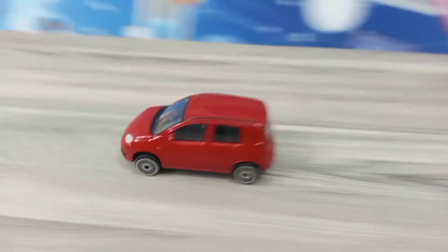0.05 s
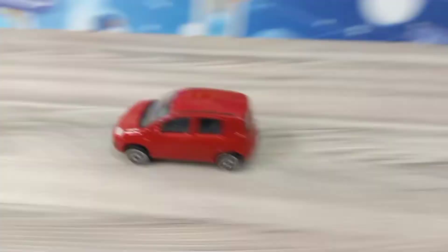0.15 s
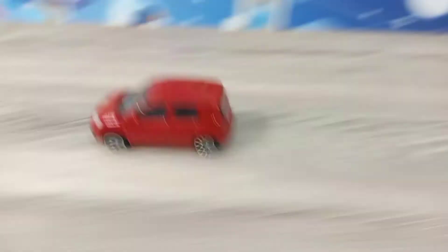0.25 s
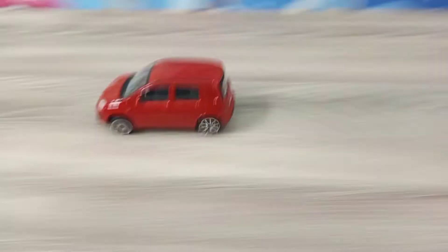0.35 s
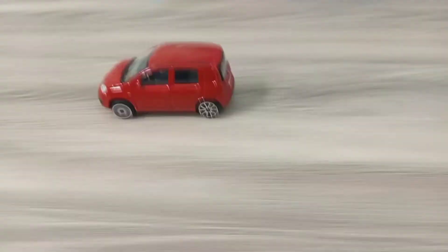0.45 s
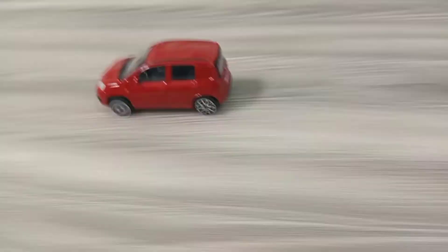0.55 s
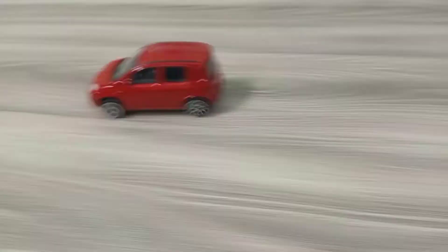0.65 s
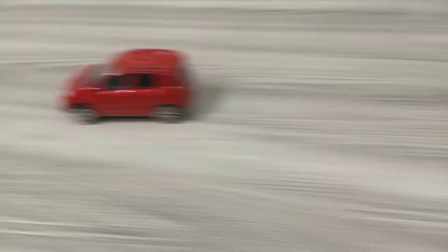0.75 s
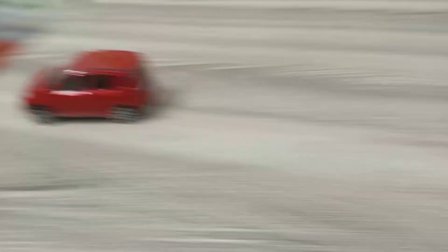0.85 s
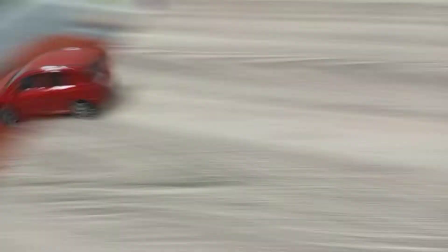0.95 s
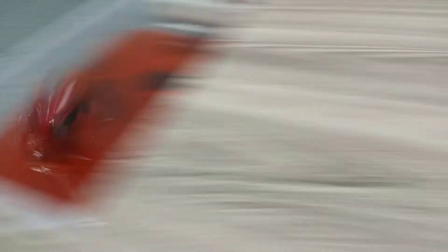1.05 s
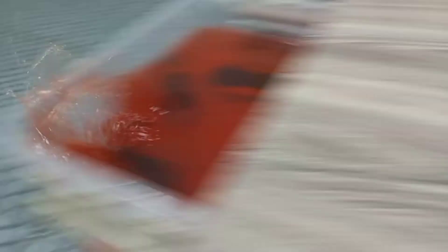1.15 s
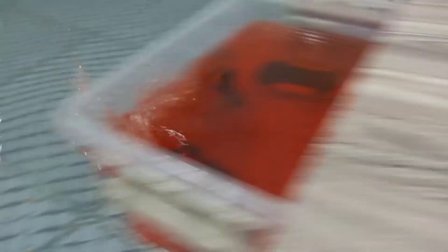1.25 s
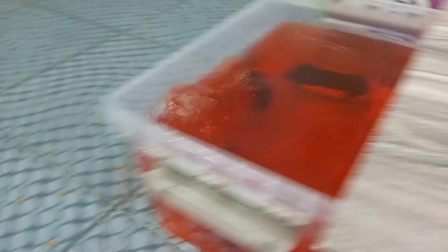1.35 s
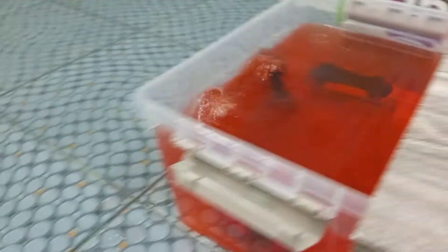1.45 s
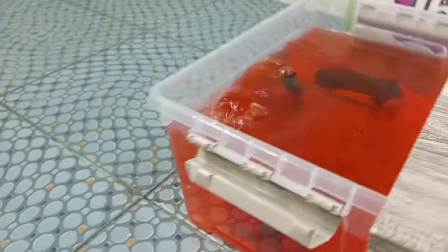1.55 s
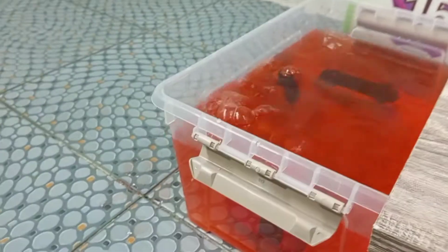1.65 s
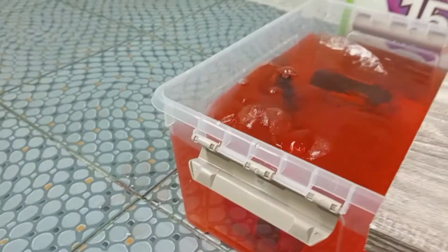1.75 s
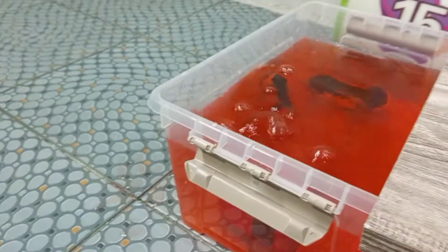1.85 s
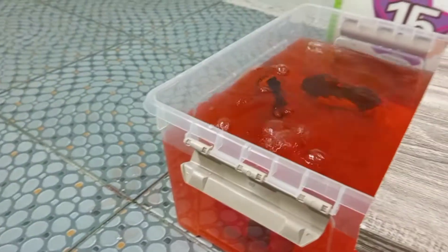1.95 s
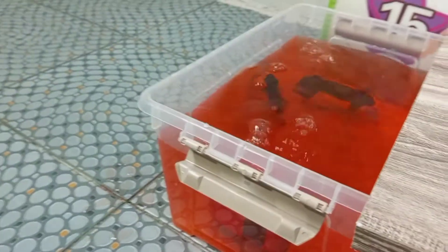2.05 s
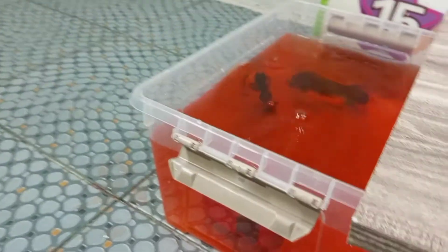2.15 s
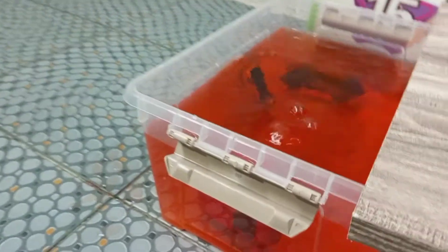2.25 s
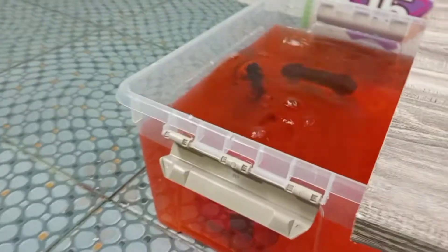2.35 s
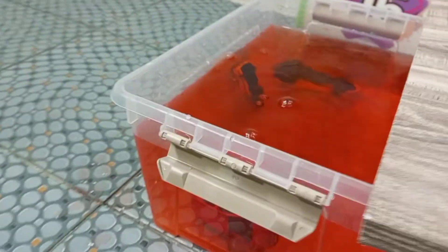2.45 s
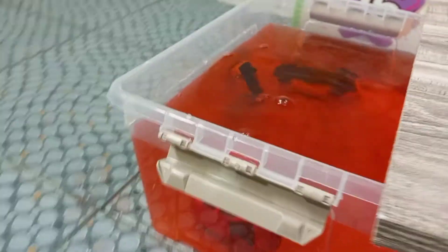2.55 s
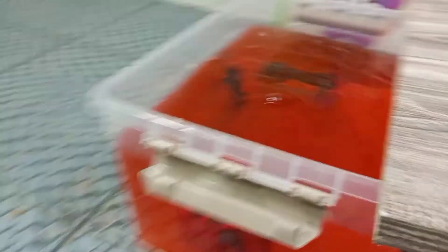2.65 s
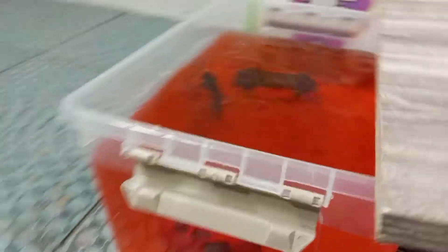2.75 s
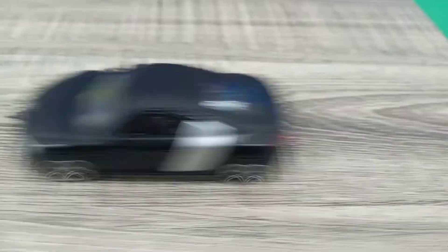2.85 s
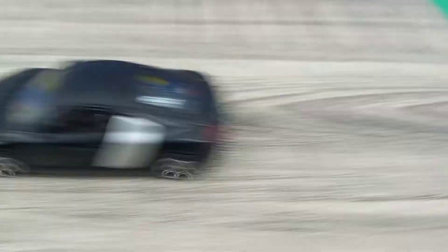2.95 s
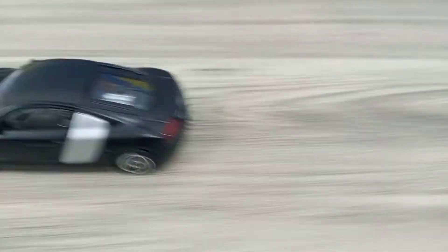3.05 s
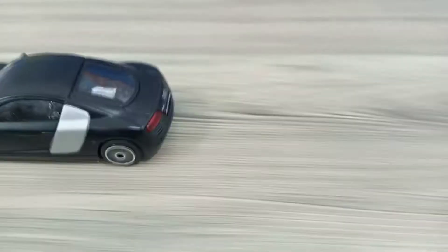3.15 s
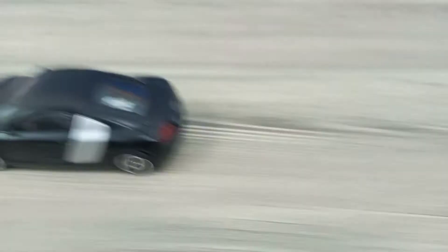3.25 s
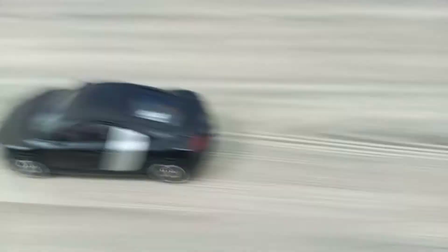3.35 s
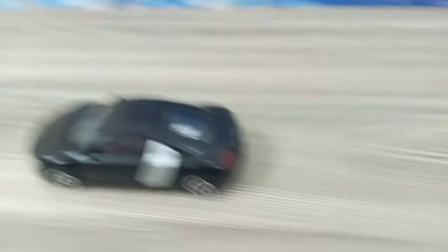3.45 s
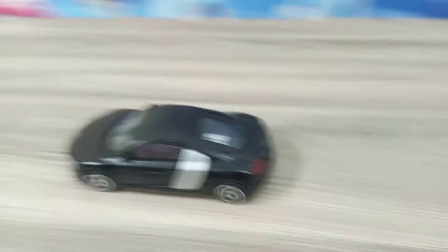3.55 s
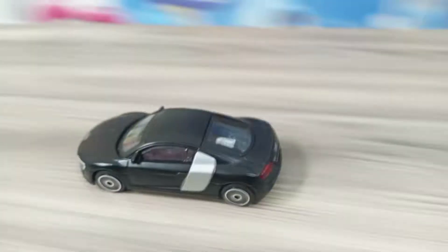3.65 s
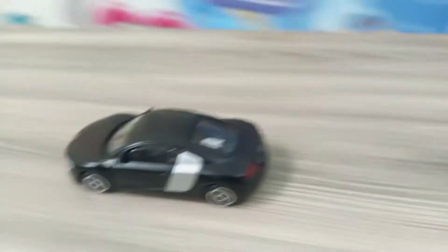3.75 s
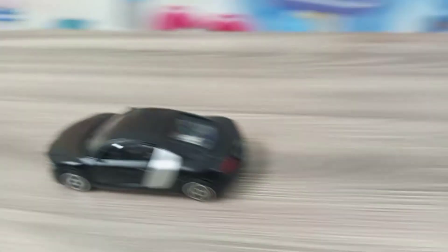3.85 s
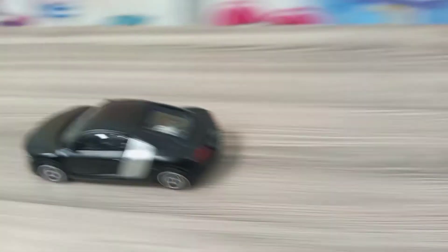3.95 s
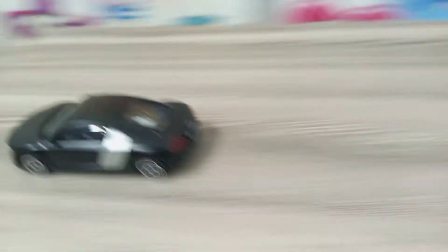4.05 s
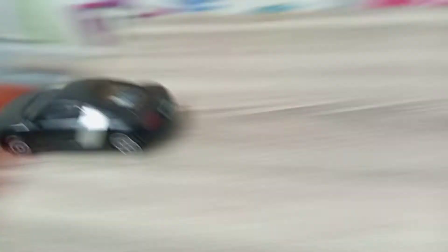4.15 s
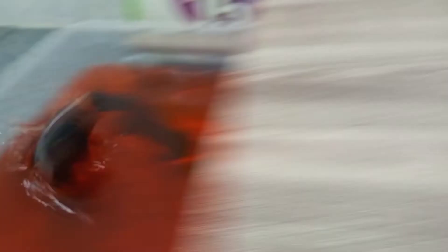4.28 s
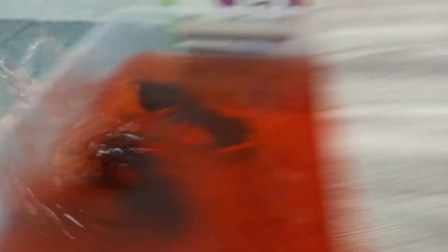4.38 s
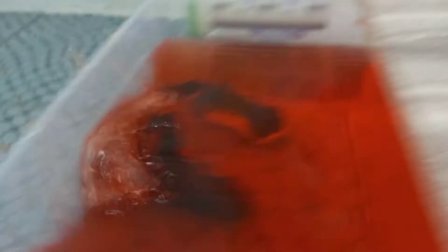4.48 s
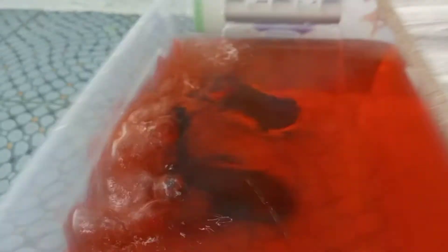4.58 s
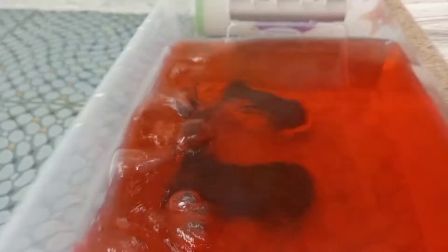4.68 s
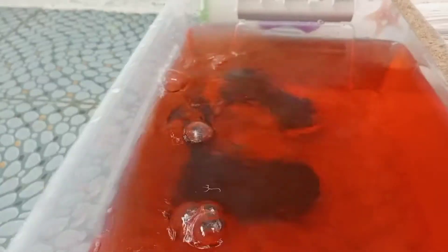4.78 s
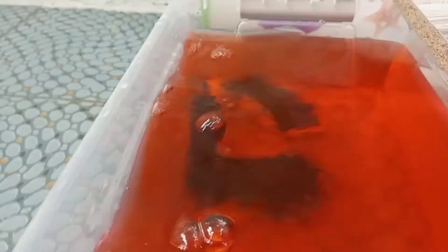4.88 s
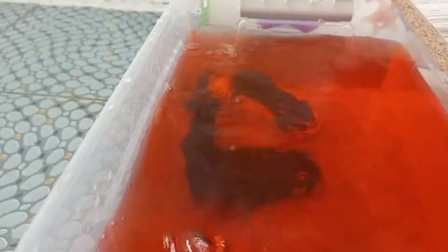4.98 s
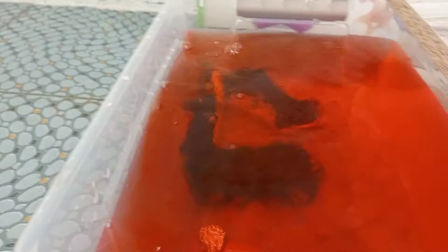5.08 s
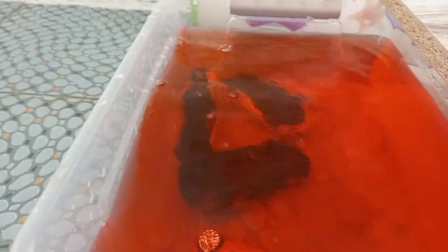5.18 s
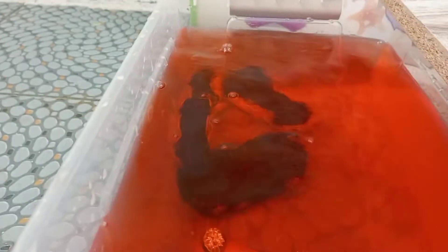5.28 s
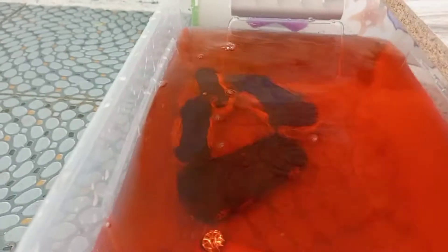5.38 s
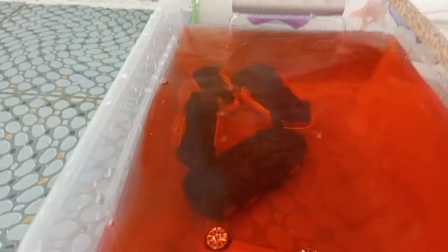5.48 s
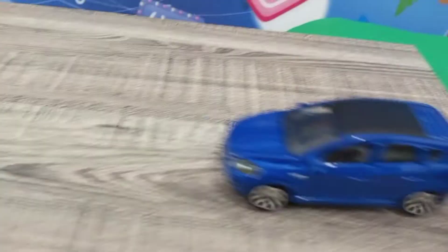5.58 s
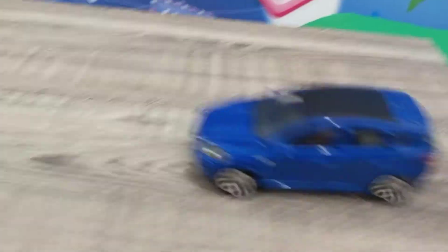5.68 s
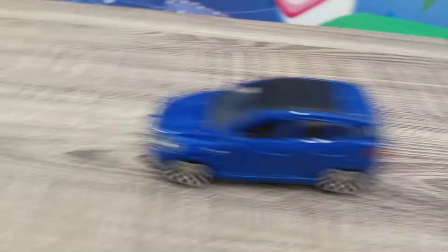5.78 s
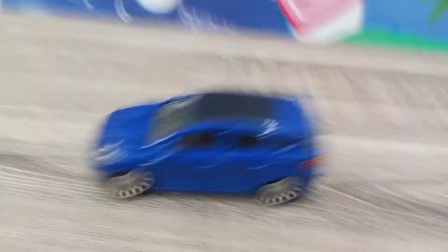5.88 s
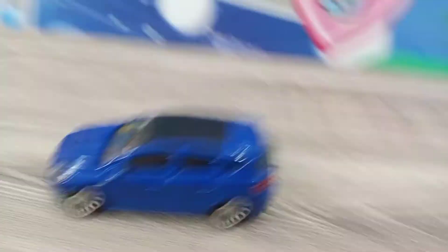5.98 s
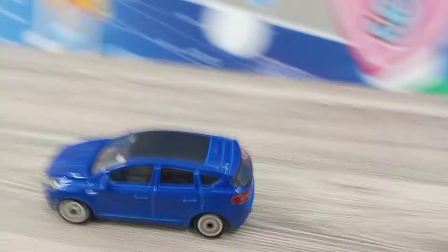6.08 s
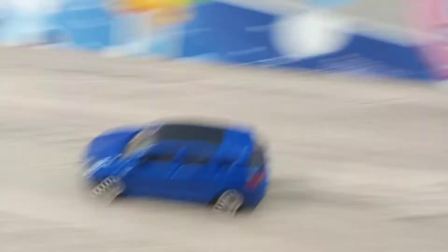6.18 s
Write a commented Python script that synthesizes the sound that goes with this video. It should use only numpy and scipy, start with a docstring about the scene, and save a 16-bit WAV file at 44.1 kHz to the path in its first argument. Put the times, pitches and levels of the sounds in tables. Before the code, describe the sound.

A small metal toy car rattles down a wooden ramp from the start, its wheels humming and jingling lightly. At about 1.2 seconds it splashes into a plastic tub of water with a soft low boom, followed by gurgles, faint fizz and tiny drips that settle by 2.6 seconds. After a very brief dropout near 2.8 seconds, a second car rolls down, growing louder, with sharp clicks from its loose axles. It splashes in at about 4.4 seconds and clinks against the tub and the first car. The water sloshes, bubbles and fizzes until another tiny dropout around 5.6 seconds. A third car then starts rolling, quieter but building, until the end just after 6 seconds. Everything sounds close in a small room, with a faint low rumble, a few very faint high chirps and soft thumps near 0.3, 2.6, 3.1 and 6.2 seconds.

```python
"""Three die-cast toy cars rattle down a wooden ramp, one after another; the first two splash into a plastic
tub of water, which gurgles, fizzes and settles. The wood grain jolts the wheels and rings shell, loose
axles and board; in the water, trapped air rings as bubbles and spray crackles. Around them are a small
room, a low rumble, a few soft close thumps and high chirps. The sound drops out briefly between cars."""
import sys
import numpy as np
from scipy import signal
from scipy.fft import rfft, irfft, next_fast_len
from scipy.io import wavfile
from scipy.ndimage import uniform_filter1d, map_coordinates

SR = 44100
rng = np.random.default_rng(int(sys.argv[2]) if len(sys.argv) > 2 else 0)


def output_pcm(signal):
    """Save a mono or channel-first signal as 16-bit PCM at the path in sys.argv[1].

    Samples are clipped to [-1, 1] before scaling.
    """
    pcm = np.clip(np.atleast_2d(signal).T, -1, 1) * 32767
    wavfile.write(sys.argv[1], SR, np.round(pcm).astype(np.int16))


N = 274302

# silent gaps between one car's run and the next: start/s, end/s
GAPS = [(2.809, 2.817), (5.576, 5.584)]
# spectrum of fine spray: f/Hz, level/dB
SPRAY = [(2000, -44), (3300, 2.5), (4500, 8), (6500, -0.5), (9000, 3), (12500, 11), (17000, 2.5)]
# bright snap of a bursting drop: f/Hz, width/Hz, level/dB
SPLAT = [(4530, 2300, 3.5), (10580, 3500, 14)]


def amp(db):
    """Gain of a level in dB."""
    return 10 ** (np.asarray(db) / 20)


def unit(x):
    """Scaled to rms 1."""
    return x / np.sqrt(np.mean(x ** 2) + 1e-20)


def along(points, hz):
    """(f/Hz, value) points read on a log axis."""
    f, values = np.transpose(points)
    return np.interp(np.log(hz + 1), np.log(f + 1), values)


def curves(rows):
    """An envelope for each column after the time, then a gate that is open over the table's span."""
    times, *columns = np.transpose(rows)
    t = np.arange(N) / SR
    gate = uniform_filter1d(((t >= times[0]) & (t <= times[-1])) * 1., size=200)
    return [np.interp(t, times, column) for column in columns] + [gate]


def wobble(rate):
    """A smooth random curve, rate knots a second."""
    return map_coordinates(rng.standard_normal(int(N * rate / SR) + 4), [np.arange(N) * rate / SR])


def filtered(x, response):
    """x through a complex frequency response."""
    size = next_fast_len(N + SR // 2)
    return irfft(rfft(x, size) * response(np.fft.rfftfreq(size, 1 / SR)), size)[:N]


def resonant(x, modes):
    """x ringing through resonances (f/Hz, width/Hz, level/dB) of alternating polarity, rms 1."""
    def body(f):
        return sum((-1) ** k * amp(db) * 1j * f * width / (hz * hz - f * f + 1j * f * width)
                   for k, (hz, width, db) in enumerate(modes))
    return unit(filtered(x, body))


def coloured(x, spectrum):
    """x shaped by a spectrum (f/Hz, level/dB), rms 1."""
    return unit(filtered(x, lambda hz: amp(along(spectrum, hz))))


def patchy(x, depth_db):
    """Bands swell and fade on their own: random gain patches over time and frequency."""
    spectrum = signal.stft(x, nperseg=256)[2]
    patches = uniform_filter1d(rng.standard_normal(spectrum.shape), size=4, axis=0)
    patches = unit(uniform_filter1d(patches, size=8, axis=1))
    return unit(signal.istft(spectrum * amp(depth_db * patches), nperseg=256)[1][:N])


def jolts(rate, spread_db, hiss):
    """Random clicks of scattered size, rate a second, over a smooth hiss."""
    chance, size, noise = rng.random(N), rng.exponential(size=N), rng.standard_normal(N)
    clicks = (chance < rate / SR) * amp(spread_db * np.minimum(size, 2.4)) * np.sign(noise)
    return unit(clicks) + hiss * rng.standard_normal(N)


def hum(hz, rate):
    """A wavering tone that follows a pitch curve, rms 1."""
    phase = 2 * np.pi * np.cumsum(hz) / SR
    return unit(wobble(rate) * np.cos(phase) + wobble(rate) * np.sin(phase))


def add(out, s, burst):
    """Mixes a burst in at s seconds."""
    out[round(s * SR):][:len(burst)] += burst[:N - round(s * SR)]


def bursts(rows, hiss, t60, attack):
    """Short puffs (t/s, level/dB) cut from a hiss."""
    out, t = np.zeros(N), np.arange(SR // 20) / SR
    for s, db in rows:
        envelope = amp(db - 60 * t / t60) * (1 - np.exp(-(t / attack) ** 2))
        add(out, s, envelope * hiss[round(s * SR):][:len(t)])
    return out


def ticks(rows, colour, ring_t60, snap_t60, snap_gain, rough):
    """Each tick (t/s, level/dB, f/Hz) is a short, roughened ring plus a broad snap of noise."""
    out, t = np.zeros(N), np.arange(SR // 30) / SR
    noise = resonant(rng.standard_normal(N), colour)
    grit = (1 + rough * wobble(1700)) / np.hypot(1, rough)  # smears the note into a band
    for s, db, hz in rows:
        ring = amp(-60 * t / ring_t60) * np.sin(2 * np.pi * hz * t) * grit[round(s * SR):][:len(t)]
        snap = snap_gain * amp(-60 * t / snap_t60) * noise[round(s * SR):][:len(t)]
        add(out, s, amp(db) * (1 - np.exp(-t / 0.00041)) * (ring + snap))
    return out


def tones(rows, rise, attack, shake_rad=0., shake_rate=100):
    """Damped tones (t/s, level/dB, f/Hz, t60/s) gliding up by the fraction rise per t60."""
    out, t = np.zeros(N), np.arange(SR // 4) / SR
    waver = np.pad(shake_rad * wobble(shake_rate), (0, len(t)))
    for s, db, hz, t60 in rows:
        phase = 2 * np.pi * hz * (t + rise * t * t / (2 * t60)) + waver[round(s * SR):][:len(t)]
        add(out, s, amp(db - 60 * t / t60) * (1 - np.exp(-t / attack)) * np.sin(phase))
    return out


def struck(hits, modes, pivot_hz):
    """A tone row for each hit and mode; a harder hit favours the modes above the pivot."""
    return [(s, db + mode_db + hardness * np.log2(hz / pivot_hz), hz, t60)
            for s, db, hardness in hits for hz, mode_db, t60 in modes]


def bubbles(rate, centre_hz, spread, cycles, size_db=4.0):
    """A swarm of small bubbles, rate a second, each a rising blip; rms 1."""
    draw = rng.standard_normal((int(rate * N / SR), 2))
    onsets = np.sort(rng.random(len(draw))) * N
    hz = np.clip(centre_hz * np.exp(spread * draw[:, :1]), 150, 9000)
    t = np.arange(SR // 60) / SR
    life = hz * t / cycles
    envelopes = amp(size_db * draw[:, 1:]) * np.exp(-3 * life) * life ** .5
    blips = envelopes * np.sin(2 * np.pi * hz * t * (1 + 0.11 * life))
    index = onsets[:, None].astype(int) + np.arange(len(t))
    return unit(np.bincount(index.ravel(), blips.ravel(), minlength=N)[:N])


def room_air(run):
    """A quiet bed of air whose level steps with each car's run."""
    # room tone: f/Hz, level/dB
    spectrum = [(25, -28.5), (65, -3.5), (110, -6.5), (200, -6.5), (500, -13.5), (1200, -21), (5000, -23),
                (17000, -7)]
    # air in each run: level/dB
    levels = [-56, -57, -72.5]
    return amp(levels)[run] * coloured(rng.standard_normal(N), spectrum)


def rumble():
    """Low noise that comes and goes."""
    # swells: t/s, level/dB
    swells = [(0.0, -49), (0.33, -52), (0.52, -69), (1.09, -52), (1.21, -57), (1.3, -42.5), (1.63, -74.5),
              (2.86, -74), (3.15, -49.5), (3.24, -99), (3.39, -55), (4.5, -72), (4.57, -48), (4.97, -66.5),
              (5.18, -59.5), (5.32, -79), (6.05, -60), (6.22, -63)]
    # low-end colour: f/Hz, level/dB
    spectrum = [(25, -36.5), (48, -20.5), (66, 2), (85, -9.5), (108, 2), (140, -8.5), (220, -40.5)]
    return amp(curves(swells)[0]) * coloured(rng.standard_normal(N), spectrum)


def room(x):
    """The small room's reverb: each frequency dies at its own speed."""
    # decay between the walls: f/Hz, t60/s
    walls = [(200, 0.29), (2000, 0.25), (10000, 0.24)]
    hz, t, noise = signal.stft(rng.standard_normal(SR // 2), SR, nperseg=256)
    tail = signal.istft(noise * amp(-60 * t / along(walls, hz)[:, None]), SR, nperseg=256)[1]
    predelayed = np.pad(x, (300, 0))
    return signal.fftconvolve(predelayed, tail / np.linalg.norm(tail))[:N]


def chirps():
    """Brief bursts of noise at the very top of the range."""
    # chirps: t/s, level/dB
    hits = [(0.7941, -12), (0.9677, -7.5), (1.493, -18), (4.488, -8.5), (4.6797, -27), (5.1738, -14.5)]
    # their thin band: f/Hz, level/dB
    spectrum = [(13000, -56), (14200, 4.5), (15600, -6.5)]
    return bursts(hits, coloured(rng.standard_normal(N), spectrum), t60=.035, attack=.0012)


def thumps():
    """Soft, close thumps ring a few heavily damped modes."""
    # thumps: t/s, level/dB, hardness/(dB/octave)
    hits = [(0.307, -11, -1.5), (2.642, -17.5, 19), (3.132, -13, -6), (6.183, -21.5, 9)]
    # modes of the thud: f/Hz, level/dB, t60/s
    modes = [(174, -12.5, 0.028), (347, -1.5, 0.018), (533, 4.5, 0.016), (1526, -17, 0.0025),
             (6470, -37, 0.00036)]
    return tones(struck(hits, modes, pivot_hz=modes[2][0]), rise=0.084, attack=0.0044)


def fizz():
    """Sparse crisp pops: tiny bubbles bursting on the surface after each splash."""
    # spells of fizz: start/s, end/s, level/dB, fall/(dB/s)
    spells = [(1.504, 2.526, -71.5, -1), (4.603, 5.562, -64.5, 14.5)]
    t = np.arange(N) / SR
    pops = bubbles(60, centre_hz=7180, spread=.18, cycles=11, size_db=4.5)
    crackle = coloured(jolts(50, spread_db=5.5, hiss=0.05), SPRAY)
    envelope = sum(((t > start) & (t < end)) * amp(db - fall * (t - start))
                   for start, end, db, fall in spells)
    return envelope * unit(pops + 0.45 * crackle)


def droplets():
    """Droplets and bubbles tick on the settling surface."""
    # drops: t/s, level/dB, f/Hz
    drops = [(1.8127, -46, 5250), (1.8436, -39.5, 7200), (2.0363, -51, 4800), (2.1055, -51.5, 4750),
             (2.1444, -47, 6600), (2.1878, -37, 8130), (2.205, -34.5, 12500), (2.238, -38, 9000),
             (2.3082, -53, 5610), (2.4408, -47, 4770), (2.4738, -47, 4480), (5.1755, -38.5, 8830),
             (5.188, -50.5, 4840), (5.203, -51.5, 6200), (5.2304, -49, 4700)]
    return ticks(drops, SPLAT, ring_t60=0.015, snap_t60=0.0069, snap_gain=0.98, rough=0.99)


def bumps():
    """The sinking car clinks against the tub and the car lying in it, each time with a snap."""
    # contacts: t/s, level/dB, hardness/(dB/octave)
    hits = [(4.4346, -23, 7.5), (4.467, -14.5, -1.5), (4.485, -20, -4), (4.5019, -18.5, 10),
            (4.5259, -24, -5), (4.5569, -27, 4), (4.6234, -33, -9)]
    # modes of the clink: f/Hz, level/dB, t60/s
    modes = [(3370, -1.5, 0.016), (4570, -1.5, 0.023), (5520, -6, 0.016), (6590, -1, 0.019),
             (7050, -4.5, 0.014), (9400, -5.5, 0.017)]
    noise = resonant(rng.standard_normal(N), SPLAT)
    snaps = bursts([(s, db + 1) for s, db, _ in hits], noise, t60=.012, attack=0.00055)
    grit = amp(3.1 * wobble(700))
    return grit * tones(struck(hits, modes, pivot_hz=modes[1][0]), rise=0, attack=0.00065) + snaps


def surge_envelopes(start, end):
    """Gains of gurgle, trickle and spray in one stage: each surge dies fast, then settles slowly."""
    # surges as a car goes in and the tub sloshes:
    # t/s, rise/s, relative length, gurgle/dB, trickle/dB, spray/dB
    surges = [(1.242, 0.00099, 1, -29, -35.5, -26.5), (1.281, 0.0035, 1.25, -25, -39.5, -34),
              (1.33, 0.0083, 0.86, -43, -51.5, -29.5), (1.47, 0.0062, 2.26, -71, -47.5, -43),
              (1.689, 0.0029, 1.88, -61.5, -54, -51.5), (1.97, 0.05, 3.8, -67, -67, -53),
              (4.425, 0.0019, 0.62, -67, -39.5, -32.5), (4.471, 0.0032, 0.49, -31, -52, -31),
              (4.499, 0.0085, 1.44, -24, -31.5, -26.5), (4.547, 0.0038, 0.61, -25, -27.5, -21),
              (4.84, 0.0076, 0.67, -40.5, -46.5, -65.5), (4.892, 0.0059, 0.64, -53, -40.5, -38.5),
              (5.085, 0.0024, 0.33, -60, -61.5, -44.5), (5.384, 0.0068, 2.6, -56, -59, -80.5),
              (5.485, 0.0037, 0.49, -57.5, -51.5, -51)]
    # gurgle, trickle and spray at length 1: fall/(dB/s)
    fall = [134, 152.5, 175]
    tail_db, tail_db_per_s = np.array([-32.5, -12.5, -26.5]), np.array([40, 61, 34.5])
    power, span = np.zeros((N, 3)), slice(round(start * SR), round(end * SR))
    t = np.arange(N)[span, None] / SR
    for s, rise, length, *db in surges:
        if s > start - .1:
            age = np.clip(t - s, 0, None)
            decay = amp(-age / length * fall) ** 2 + amp(tail_db - age * tail_db_per_s) ** 2
            power[span] += (amp(db) * (1 - np.exp(-age / rise))) ** 2 * decay
    return np.sqrt(np.abs(uniform_filter1d(power, size=100, axis=0))).T


def slosh():
    """With each surge trapped air gurgles, water trickles back and spray crackles."""
    # first splash, second car breaking the surface, second splash: start/s, end/s
    stages = [(1.2, 2.81), (4.4, 4.496), (4.496, 5.58)]
    # air in and under the sinking car, one table a stage: f/Hz, width/Hz, level/dB
    cavities = [
        [(170, 320, -5.5), (493, 110, 1.5), (630, 380, -3), (950, 190, -1.5), (1400, 260, -0.5)],
        [(950, 170, -3.5), (1250, 260, -5.5)],
        [(215, 57, -4.5), (490, 177, -5.5), (665, 210, -7), (894, 165, -1.5), (1530, 300, -8)],
    ]
    # water running back: f/Hz, width/Hz, level/dB
    runoff = [(1780, 560, 3), (1917, 330, 8), (2550, 1100, -3.5)]
    swarm = bubbles(600, centre_hz=735, spread=0.442, cycles=6.6, size_db=5.5)
    trickle = resonant(rng.standard_normal(N), runoff)
    trickle = unit(trickle + 0.35 * bubbles(200, centre_hz=2082, spread=0.257, cycles=18))
    spray = coloured(amp(2 * wobble(44)) * jolts(160, spread_db=-0.5, hiss=1), SPRAY)
    spray = unit(spray + 0.29 * bubbles(220, centre_hz=6310, spread=0.25, cycles=7.3))
    out = np.zeros(N)
    for stage, modes in zip(stages, cavities):
        gurgle = resonant(swarm + 3 * rng.standard_normal(N), modes)
        out += np.sum(surge_envelopes(*stage) * [gurgle, trickle, spray], axis=0)
    return out


def splashes():
    """A car slaps the surface and drags air under; the tub booms, air pockets ring in churning water."""
    # the air hollow deepens as the second car sinks: t/s, level/dB, f/Hz
    plunge = [(4.43, -47, 1292), (4.465, -52, 1057), (4.485, -35.5, 850), (4.51, -42.5, 486)]
    # sharp slaps and drops on the surface: t/s, level/dB, f/Hz
    slaps = [(1.284, -28, 5960), (1.3305, -14.5, 5500), (1.4736, -32, 5180), (4.4514, -19.5, 3760),
             (4.4557, -23, 3560), (4.7095, -36.5, 6700), (4.8429, -35.5, 3680), (4.8941, -33, 4030),
             (5.0876, -37, 6077), (5.4896, -50.5, 3000)]
    # booms of the tub: t/s, level/dB, f/Hz, t60/s
    booms = [(1.25, -34, 109, 0.43), (1.33, -34, 110, 0.46)]
    # air pockets, rising in pitch near the surface: t/s, level/dB, f/Hz, t60/s
    pockets = [(1.208, -20.5, 1067, 0.034), (1.245, -9.5, 618, 0.025), (1.284, -26, 594, 0.12),
               (1.293, -4, 1280, 0.024), (1.36, -19.5, 1250, 0.051), (1.465, -31, 1734, 0.09),
               (1.476, -28, 430, 0.053), (1.597, -45, 534, 0.14), (1.62, -36, 480, .06),
               (1.638, -41, 560, 0.062), (1.706, -29.5, 410, 0.012), (1.75, -39, 368, 0.049),
               (4.474, -9, 1000, 0.025), (4.5, -12, 750, 0.028), (4.665, -39, 950, 0.052),
               (4.71, -32.5, 890, 0.18), (4.893, -27, 638, 0.072), (4.9, -34, 817, 0.1),
               (4.915, -28.5, 628, 0.096), (5.09, -48, 6200, 0.16), (5.39, -53, 642, 0.31),
               (5.424, -44, 597, 0.29), (5.462, -32, 685, 0.054), (5.488, -27, 620, 0.054),
               (5.505, -38, 845, 0.1)]
    hollow_db, hollow_hz, sinking = curves(plunge)
    out = sinking * amp(hollow_db) * hum(hollow_hz, rate=94)
    out += ticks(slaps, SPLAT, ring_t60=0.017, snap_t60=0.0069, snap_gain=1, rough=0.35)
    out += bumps()
    out += tones(booms, rise=0.0103, attack=0.013)
    return out + tones(pockets, rise=0.033, attack=0.0039, shake_rad=0.9, shake_rate=220)


def ramp_twang():
    """The ramp rings low as the first car tips off."""
    # the board's note: t/s, level/dB, f/Hz, t60/s
    twang = [(1.05, -35, 176, 0.39)]
    return tones(twang, rise=0.0089, attack=0.0065, shake_rad=1.6, shake_rate=61)


def wheel_jingles():
    """The first car's rims jingle at speed."""
    # jingles: t/s, level/dB
    hits = [(0.66, -27.5), (0.711, -25.5), (0.756, -25.5), (0.797, -20.5), (0.852, -27.5), (0.886, -27),
            (0.921, -24.5)]
    # rim resonances: f/Hz, width/Hz, level/dB
    rims = [(7500, 210, -10), (8800, 310, 2.5), (9000, 220, 0)]
    return bursts(hits, resonant(rng.standard_normal(N), rims), t60=0.07, attack=0.002)


def axle_knocks():
    """Single hard knocks of the loose axles stand out of the rattle."""
    # knocks: t/s, level/dB, f/Hz
    knocks = [(1.1119, -15.5, 4350), (2.8315, -43, 5350), (3.0086, -30, 5990), (3.1522, -23, 3450),
              (3.3209, -20, 5650), (3.4161, -10.5, 5880), (3.4476, -8.5, 5600), (3.474, -13, 5630),
              (3.5433, -10, 4300), (3.5462, -11, 5650), (3.7384, -13.5, 5410), (3.7633, -15, 5470),
              (3.8526, -15, 5370), (3.8671, -12.5, 5300), (3.9524, -12.5, 5770), (4.154, -11.5, 5520),
              (4.2028, -12.5, 5480), (4.2438, -10, 5630), (4.249, -12, 5570), (4.2742, -25.5, 5570),
              (4.2874, -11, 5400), (4.2931, -15.5, 6600), (5.9589, -32, 3380)]
    # their broad snap: f/Hz, width/Hz, level/dB
    crack = [(3530, 4100, -3), (5830, 3400, -2.5)]
    return ticks(knocks, crack, ring_t60=0.011, snap_t60=0.011, snap_gain=0.42, rough=0.72)


def axle_drift(x, slip_ms=0.491, rate=7):
    """The loose axles shift and their pitch with them: a slowly wandering delay."""
    return map_coordinates(x, [np.arange(N) + slip_ms * SR / 1000 * wobble(rate)], mode="mirror")


def rolling_cars():
    """Wood grain jolts the wheels, ringing shell, axles and board; the wheels hum and sizzle."""
    # one table a car, axle and hum relative to the shell: t/s, shell/dB, axle/dB, hum/dB, hum f/Hz
    rolls = [
        [(0, -33.5, -1.5, -4, 240), (.172, -33.5, -5.5, -9, 215), (.4, -30, -0.5, -9.5, 215),
         (.69, -30, -1, -12.5, 290), (.72, -33.5, 4, -35, 300), (.86, -30, 0.5, -16.5, 320),
         (.994, -31, 3, -19, 350), (1.1, -35.5, 3.5, -28, 400), (1.15, -41.5, -3.5, -34, 400),
         (1.24, -44, -4.5, -30, 400)],
        [(2.82, -66, -11, -27, 230), (2.932, -49, -3, -8, 240), (3.146, -38, -23.5, -15, 250),
         (3.38, -34, -4.5, -15.5, 270), (3.424, -36, -5.5, -16, 270), (3.5, -33.5, -2.5, -19.5, 280),
         (3.792, -29.5, -1.5, -17, 320), (4.11, -31.5, 2.5, -15.5, 340), (4.16, -33.5, 3.5, -16, 510),
         (4.29, -32.5, 3, -18, 540), (4.366, -36, -4.5, -22, 540), (4.43, -52, -6, -23.5, 540)],
        [(5.59, -78, -14.5, 0, 203), (5.635, -72.5, -34, -4, 210), (5.75, -61, -29, -2.5, 220),
         (5.95, -50.5, -11, -1.5, 240), (6.22, -45.5, -15.5, -6.5, 265)],
    ]
    # one row a car, levels relative to the shell:
    # start/s, off the edge/s, board/dB, its fall/(dB/s), sizzle/dB, its fall/(dB/s)
    cars = [(0, 1.1, -9.5, 11, 9, 6.5), (2.82, 4.15, -5.5, 5, 1.5, 2), (5.59, 7.1, -6.5, -12, -7, -9)]
    # shell resonances of each car: f/Hz, width/Hz, level/dB
    shells = [
        [(1546, 404, -9.5), (1968, 65, -4.5), (2300, 156, -5.5), (2630, 1760, -6.5), (3192, 1350, -5.5),
         (1677, 61, -12.5)],
        [(1800, 620, 0), (2103, 115, 6.5), (2270, 190, 1.5), (2910, 410, 1.5), (3400, 680, -1.5)],
        [(1550, 1070, 3), (2025, 310, 0), (3380, 520, -5)],
    ]
    # axle and wheel resonances of each car: f/Hz, width/Hz, level/dB
    axles = [
        [(4087, 133, 8), (4980, 1300, -1), (5180, 220, 4), (6200, 330, 1.5), (8700, 910, -12)],
        [(3990, 660, 1.5), (5320, 750, 5.5), (5880, 820, 5), (9640, 280, -13)],
        [(3710, 1100, 3), (5600, 450, 5.5), (6750, 770, 3.5), (9000, 420, 7.5)],
    ]
    # ramp resonances under each car: f/Hz, width/Hz, level/dB
    boards = [
        [(413.4, 470, -0.5), (667, 63, 3), (1150, 460, -7.5)],
        [(504, 370, 2), (672, 50, 6.5), (877, 430, -2.5), (1070, 74, 10)],
        [(529, 55, 0), (807, 69, -4)],
    ]
    # wheel sizzle: f/Hz, level/dB
    sizzle = [(6000, -29.5), (9500, -6.5), (11000, -6.5), (17000, -6.5)]
    airborne_db, lift_s = -13, 0.078  # board and sizzle drop once the wheels leave the edge
    hollow_s, hollow_share = 0.14, 0.26  # the shell turns hollow just before the edge
    out, t = np.zeros(N), np.arange(N) / SR
    for roll, car, shell, axle, board in zip(rolls, cars, shells, axles, boards):
        shell_db, axle_db, hum_db, hum_hz, rolling = curves(roll)
        start, edge, board_db, board_fall, sizzle_db, sizzle_fall = car
        age = np.clip(t - start, 0, 2)
        lift_db = airborne_db * np.clip((t - edge) / lift_s, 0, 1)
        chatter = wobble(45)  # the wheels skip in bursts
        grain = jolts(900, spread_db=1, hiss=1)
        axle_play = jolts(290, spread_db=2, hiss=0.37)
        rattle = amp(0.75 * chatter) * (grain + 1.58 * axle_play)
        # when the car is slow or near the edge, one shell resonance comes forward
        slow = np.clip((-33.5 - shell_db) / 24, 0, .8)
        near_edge = np.clip(1 - (edge - t) / hollow_s, 0, 1)
        share = np.maximum(slow, hollow_share * near_edge)
        full_shell = resonant(patchy(amp(0.59 * chatter) * grain, depth_db=2), shell)
        shell_note = resonant(jolts(900, spread_db=5, hiss=0.85), shell[1:2])
        sound = np.sqrt(1 - share) * full_shell + np.sqrt(share) * shell_note
        sound += amp(axle_db) * axle_drift(resonant(patchy(rattle, depth_db=2), axle))
        wood = resonant(amp(2 * wobble(20)) * grain, board)
        sound += amp(board_db - board_fall * age + lift_db) * wood
        sound += amp(hum_db) * hum(hum_hz, rate=150)
        sound += amp(sizzle_db - sizzle_fall * age + lift_db) * coloured(rattle, sizzle)
        out += rolling * amp(shell_db) * sound
    return out


def scene():
    """Cars and water in the room, over dry background sounds; each run's reverb stops with that run."""
    cars = rolling_cars() + axle_knocks() + wheel_jingles() + ramp_twang()
    water = slosh() + splashes() + fizz() + droplets()
    direct = cars + water
    run = np.searchsorted([end for _, end in GAPS], np.arange(N) / SR)
    reverb = sum((run == k) * room((run == k) * direct) for k in range(len(GAPS) + 1))
    background = room_air(run) + rumble() + chirps() + thumps()
    return (direct + amp(-10) * reverb + background)[None]


def record(dry):
    """Dulls the treble, mutes the gaps, rounds off the peaks and cuts the very top."""
    # overall tone: f/Hz, level/dB
    tone = [(20, -33.5), (55, -2), (6400, 1.5), (7400, -6), (8800, -12.5), (10500, -29), (13000, -37.5),
            (14800, -27), (16000, -23)]
    ceiling, top_hz = 0.44, 15750
    t = np.arange(N) / SR
    gate = np.prod([(t < start) | (t > end) for start, end in GAPS], axis=0)
    sound = filtered(dry[0], lambda hz: amp(along(tone, hz)))
    sound *= uniform_filter1d(gate * 1., size=100)
    sound = ceiling * sound / (ceiling ** 4 + sound ** 4) ** (1 / 4)
    return filtered(sound, lambda hz: hz < top_hz)[None]


dry = scene()
out = record(dry)
output_pcm(out)
```